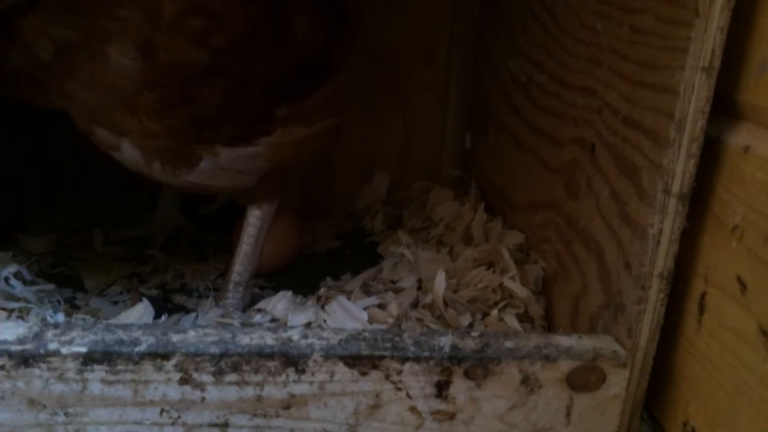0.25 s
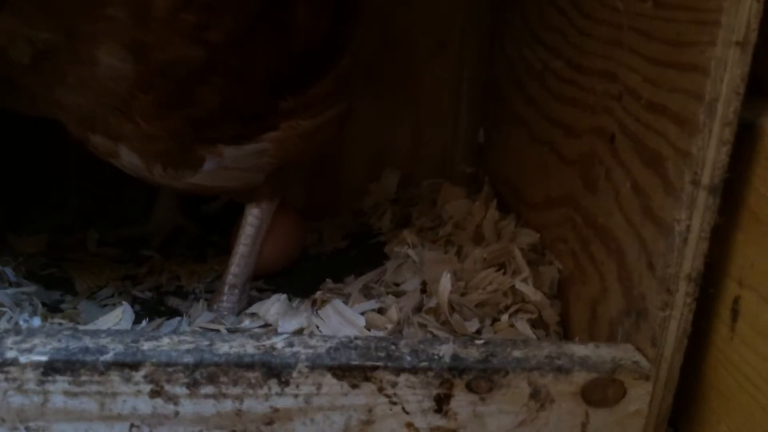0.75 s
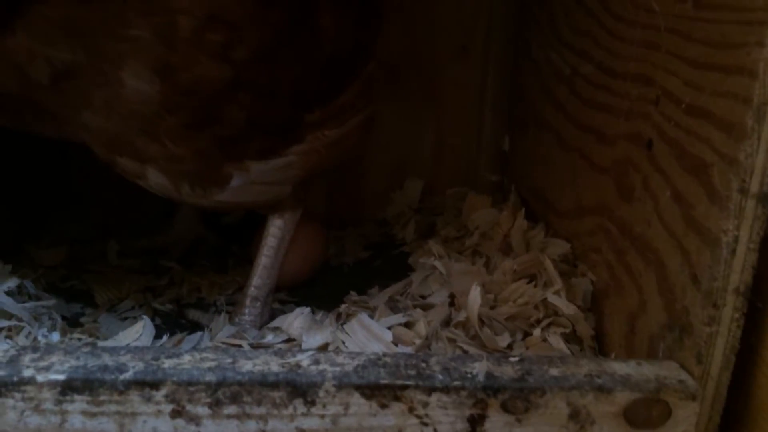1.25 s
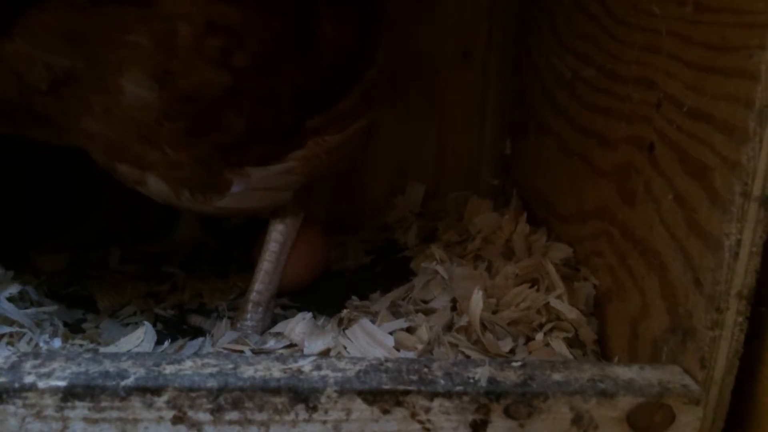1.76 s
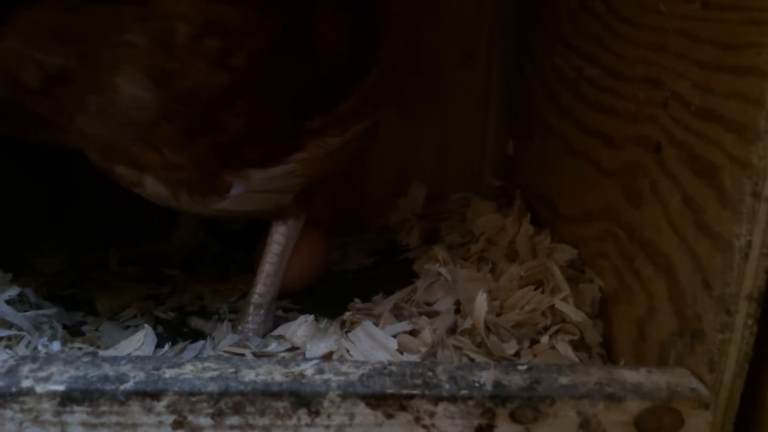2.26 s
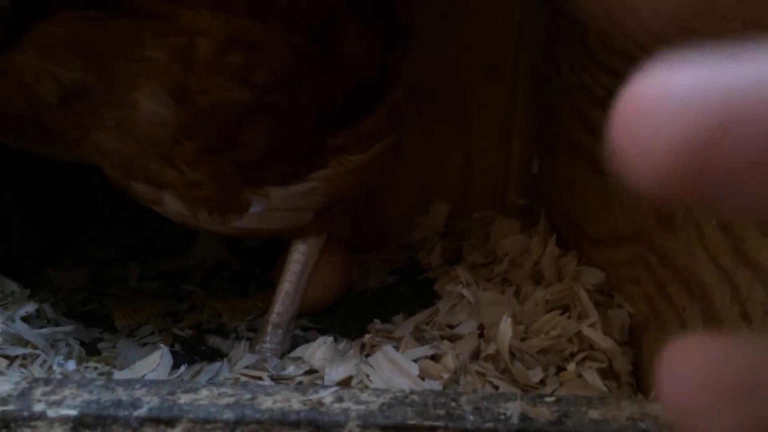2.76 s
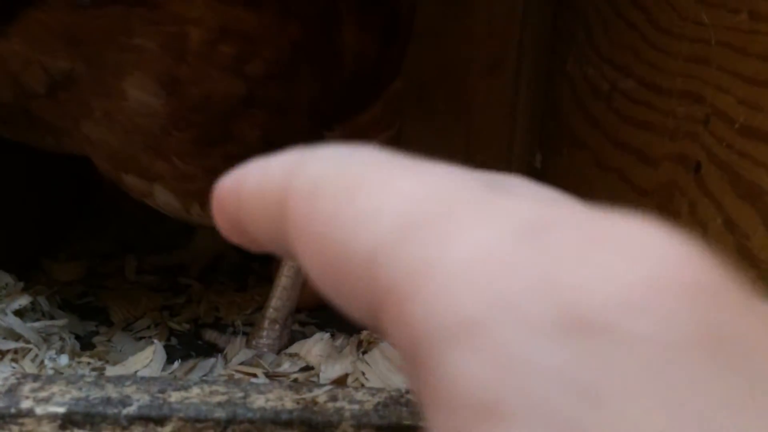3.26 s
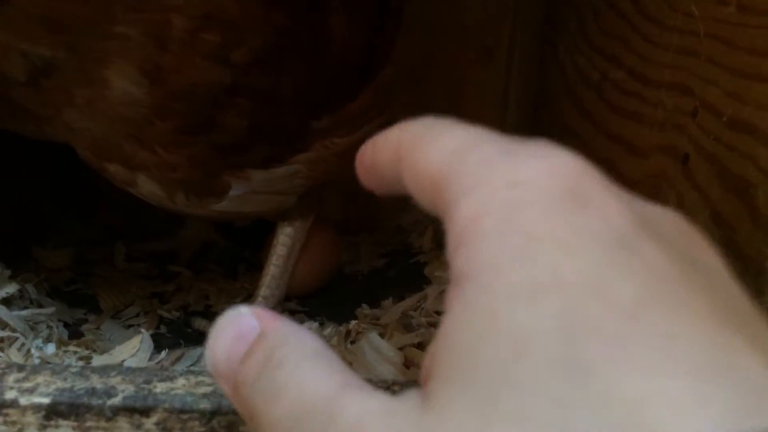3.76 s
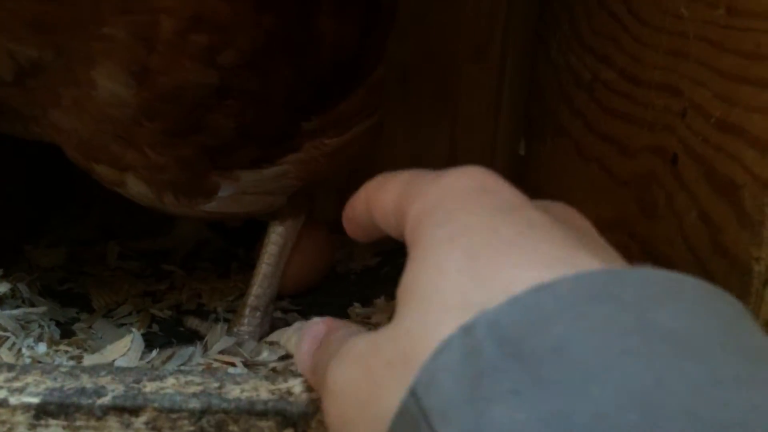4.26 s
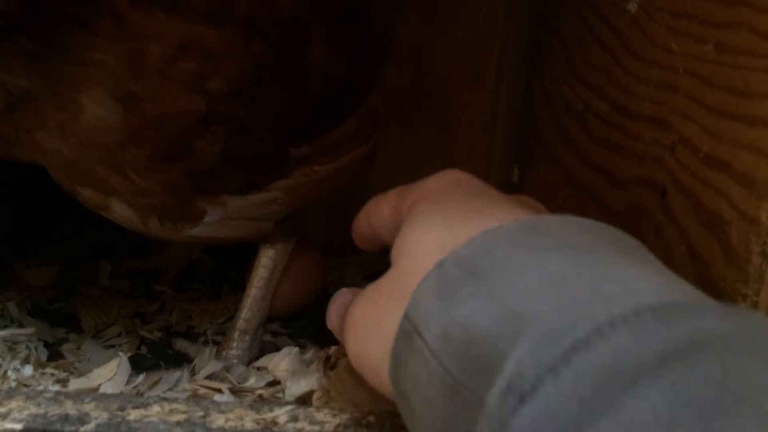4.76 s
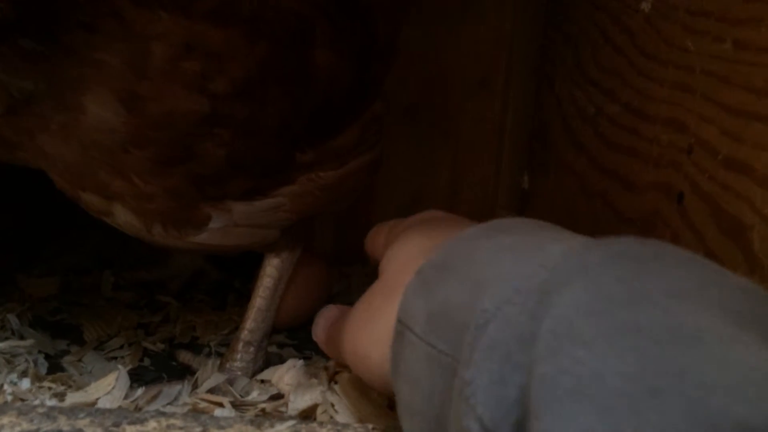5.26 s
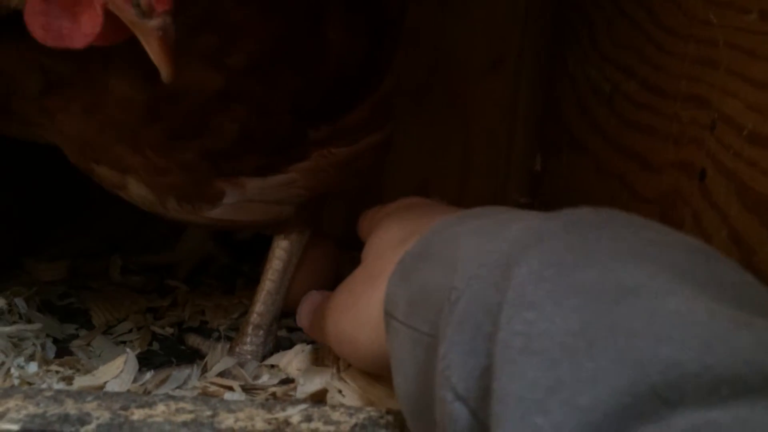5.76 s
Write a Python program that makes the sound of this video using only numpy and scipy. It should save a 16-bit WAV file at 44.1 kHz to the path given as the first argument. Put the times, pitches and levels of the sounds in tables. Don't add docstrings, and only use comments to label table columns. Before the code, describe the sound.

Close, raspy hen moans and broken clucking cries in a small box, with tiny dry shaving ticks over steady low hum and soft air.

```python
import sys
import numpy as np
from scipy import signal
from scipy.fft import rfft, irfft, next_fast_len
from scipy.io import wavfile
from scipy.ndimage import uniform_filter1d, map_coordinates

SR = 44100
rng = np.random.default_rng(int(sys.argv[2]) if len(sys.argv) > 2 else 0)


def boost(x):
    u = np.asarray(x, float) / 20
    return 10 ** u


def store_wav(level_fs):
    pcm = np.round(np.clip(np.atleast_2d(level_fs), -1, 1) * 32767)
    wavfile.write(sys.argv[1], SR, pcm.T.astype(np.int16))


N = 265041

# frequency_hz, gain_db
WINDPIPE = [(300, -44), (500, -4.5), (600, -7.5), (800, -14.5), (1150, 9), (1400, -1.5), (1600, -9),
            (1900, -20.5), (2250, -21.5)]
# frequency_hz, gain_db
BEAK = [(2300, -20), (2650, -13), (3020, 0), (3300, -9), (3650, -22), (4200, -15), (4900, -36), (6000, -46),
        (6700, -35), (7500, -54), (8450, -41), (9600, -47), (11000, -60), (15000, -62)]
SLIDE_DB = -31.5


def unit(x):
    return x / np.sqrt(np.mean(x ** 2) + 1e-20)


def along(points, hz):
    f, v = np.transpose(points)
    return np.interp(np.log(hz + 1), np.log(f + 1), v)


def wobble(rate):
    knots = rng.standard_normal(int(N * rate / SR) + 4)
    return map_coordinates(knots, [np.arange(N) * rate / SR])


def coloured(x, points):
    m = next_fast_len(N + 8192)
    gain = boost(along(points, np.fft.rfftfreq(m, 1 / SR)))
    return irfft(rfft(x, m) * gain, m)[:N]


def coloured_noise(points):
    return unit(coloured(rng.standard_normal(N), points))


def hen():
    # time_s, rasp_db, pitch_jitter_share
    breathiness = [(0, -16, .018), (.8, -13, .024), (1.3, -9, .045), (1.5, -15, .015), (1.7, -15, .018),
                   (1.8, -10, .035), (2.05, -22, .008), (2.7, -22, .007), (3.7, -14, .025),
                   (4.4, -13, .018), (4.88, -13, .018), (4.94, -5, .045), (5.0, -13, .018),
                   (5.5, -10, .022)]
    voice, time = np.zeros(N), np.arange(N) / SR
    rasp_s, *rasp_columns = np.transpose(breathiness)
    rasp_db, jitter = (np.interp(time, rasp_s, column) for column in rasp_columns)
    waver = 1 + jitter * (wobble(150) + .6 * wobble(300))
    low_flutter, high_flutter = boost(.8 * wobble(120)), boost(110 * jitter * wobble(170))

    low_air = coloured_noise(WINDPIPE + [(2400, -120)])
    high_air = coloured_noise([(2000, -120)] + BEAK[:5] + [(4300, -30), (9000, -70)])
    beads = coloured_noise([(3060 + side * 190, -9 * side ** 2) for side in np.arange(-4, 5)])
    sizzle = coloured_noise([(3600, -120)] + BEAK[5:] + [(15500, -120)])

    for throbs in calls():
        span = slice(round(throbs[0][0] * SR), round(throbs[-1][0] * SR))
        rasp = rasp_db[span]
        glide, octave, level, bright = gestures(throbs, time[span])
        low, high, phase = harmonics(glide * waver[span], octave)
        gate = boost(rasp) * (1 + 0.26 * np.cos(phase))
        windpipe_sound = low + gate * low_air[span]
        beak_sound = (high + boost(7) * gate * high_air[span]) / np.hypot(1, boost(8 + rasp))
        voice[span] += level * windpipe_sound * low_flutter[span]
        voice[span] += bright * beak_sound * high_flutter[span]
        voice[span] += bright * boost(3.5 + rasp) * beads[span]
        voice[span] += bright * boost(-27) * (1 + np.cos(phase)) * sizzle[span]
    return voice


def harmonics(glide, octave):
    pitch = glide * 2. ** octave
    phase = 2 * np.pi * np.cumsum(glide) / SR * 2. ** octave
    k = np.arange(1, 27)[:, None]
    hz = k * pitch
    flip_fade = np.clip(1 - 2 * (uniform_filter1d(octave * 1., size=400) - octave), 0, 1)
    odd = flip_fade * boost(-14 * np.clip((572 - pitch) / 20, 0, 1))
    source = np.where(k % 2, odd, 1)

    low = source * boost(along(WINDPIPE, hz)) * (hz < 2300)
    high = source * boost(along(BEAK, hz)) * (hz >= 2300) * (hz < SR / 3)
    top = hz > 3800
    high_note_loss_db = 13 * top * np.clip((pitch - 630) / 60, 0, 1)
    high *= boost(-high_note_loss_db - 5.8 * top * (pitch < 560) - 2 * (hz > 5000))

    waves = np.sqrt(2) * np.sin(k * phase)
    low_power = uniform_filter1d((low ** 2).sum(0), size=150)
    high_power = uniform_filter1d((high ** 2).sum(0), size=500)
    beak_even = 0.67
    low = (low * waves).sum(0) / np.sqrt(low_power)
    high = (high * waves).sum(0) / high_power ** (beak_even / 2)
    return low, high, phase


def gestures(throbs, t):
    s, peak_db, hz, dip_db, beak_db = np.transpose(throbs)
    step = np.diff(np.log2(hz))
    flips = np.r_[0, np.cumsum((step > .5) * 1 - (step < -.72))]
    rows = np.arange(len(s))
    place = np.interp(t, s, rows)
    octave = flips[np.round(place).astype(int)]
    dip = dip_db[place.astype(int)] * np.sin(np.pi * place) ** 4
    dwell = place - np.sin(2 * np.pi * place) / (2 * np.pi) * .75
    glide = 2 ** (np.interp(dwell, rows, np.log2(hz) - flips) + .002 * dip)
    edge = np.clip(np.minimum(t - s[0] + (s[0] == 0), s[-1] - t) / 0.019, 0, 1)
    level = boost(np.interp(dwell, rows, peak_db) + 1.4 * dip)
    bright = boost(np.interp(dwell, rows, beak_db) + 1.0 * dip)
    return glide, octave, level * edge, bright * edge


def calls():
    # time_s, peak_db, pitch_hz
    moan = [(0.0, -29, 1102), (.045, -33.5, 1090), (.09, -34.5, 1044), (.144, -30, 982),
            (.178, -27.5, 1017), (.212, -22.5, 1097), (.237, -16.5, 1123), (.267, -21.5, 1104),
            (.281, -24.5, 1101), (.329, -27.5, 1073), (.349, -29, 534.7), (.421, -28.5, 1047),
            (.449, -22, 1106), (.473, -20.5, 553.2), (.499, -26.5, 539.6), (.533, -27.5, 547),
            (.643, -20.5, 1088), (.668, -16, 1140), (.69, -23.5, 1115), (.85, -16, 1093),
            (.876, -23.5, 557.2), (.896, -22.5, 1078), (.92, -24, 1093), (.946, -22.5, 1085),
            (1.098, -18.5, 547), (1.123, -22, 1109), (1.149, -20.5, 1091), (1.273, -30, 823),
            (1.287, -15.5, 596), (1.293, -44, 611)]
    # time_s, peak_db, pitch_hz
    squawk = [(1.519, -19.5, 663.8), (1.546, -21, 590.7), (1.574, -34, 1119), (1.586, -32, 750),
              (1.632, -26.5, 775), (1.702, -31, 815), (1.718, -22, 676), (1.74, -26, 770),
              (1.75, -22, 505.7), (1.774, -27.5, 997), (1.79, -29.5, 798), (1.828, -29, 782.6),
              (1.852, -23, 1100), (1.864, -18.5, 1188), (1.874, -44, 1227)]
    # time_s, peak_db, pitch_hz
    wail = [(3.67, -39, 913.5), (3.715, -37.5, 970), (3.753, -31, 1069), (3.847, -34, 900.3),
            (3.883, -30.5, 966), (3.939, -27.5, 1021), (3.969, -26.5, 1127), (4.025, -27.5, 1005),
            (4.04, -36, 864), (4.071, -30.5, 758), (4.135, -33, 797.5), (4.147, -27, 1036),
            (4.171, -23, 509.2), (4.216, -27, 515.4), (4.246, -29, 774), (4.4, -31, 794),
            (4.672, -30, 813.2), (4.687, -14.5, 641.3), (4.712, -26.5, 631), (4.735, -30, 624.3),
            (4.757, -35, 818.2), (5.096, -32, 793.4), (5.118, -27.5, 1034), (5.138, -26.5, 1082),
            (5.155, -31, 786), (5.226, -29.5, 787.6), (5.278, -27.5, 727), (5.308, -33, 595),
            (5.43, -26.5, 599.5), (5.444, -51, 567)]
    # time_s, pitch_hz, level_db
    drone_points = [(1.7, 816, -29), (3.8, 1011, -33.5), (3.97, 980, -28), (4.09, 748, -36),
                    (4.14, 802, -17.5), (4.33, 784, -30.5), (4.46, 857, -31.5), (4.8, 810, -33.5),
                    (5.02, 852, -35.5), (5.19, 830, -34), (5.42, 770.4, -32.5)]
    # time_s, ring_db
    gape = [(0, -39), (.37, -38.5), (.48, -40.5), (.62, -37.5), (.77, -42), (.85, -34.5), (1.28, -41),
            (1.55, -41.5), (1.75, -35), (2.1, -42.5), (2.5, -36), (3.9, -50), (4.2, -43), (4.45, -43),
            (4.65, -38.5), (4.94, -36), (5.03, -36), (5.28, -35.5)]

    def climb(t, u):
        slack_hz, climb_to_hz = 899, 1057
        return slack_hz - 55 * t + (climb_to_hz - slack_hz) * u ** 2.2, -33.5

    def drone(t, u):
        drone_s, *columns = np.transpose(drone_points)
        return [np.interp(t, drone_s, column) for column in columns]

    four_calls = [(murmured(moan, climb, .015, 0.078, -11), 0.12),
                  (murmured(squawk, drone, .026, .03, -8.5), .4),
                  (cackle(), 0.83),
                  (murmured(wail, drone, .026, .03, -5.5), 0.73)]
    out = []
    for rows, ring_grows in four_calls:
        s, db, hz, dip = np.transpose(rows)
        tuned_db = along(BEAK, np.arange(2, 8)[:, None] * hz).max(0)
        ring_db = np.interp(s, *np.transpose(gape)) + ring_grows * (db - SLIDE_DB) + 0.1 * (tuned_db + 7.5)
        out.append(np.c_[s, db, hz, dip, ring_db])
    return out


def murmured(throbs, slack, step_s, scatter, dip_db):
    fill_over_s, murmur_dip, murmur_db = .048, 0.453, 0.5
    chance, rows = rng.standard_normal((700, 4)), []
    for (s, db, hz), (after, *_) in zip(throbs, throbs[1:] + throbs[-1:]):
        gap = after - s
        wide = gap > fill_over_s
        rows.append((s, db, hz, murmur_dip * dip_db if wide else dip_db * min(gap / 0.027, 1) ** 2))
        count = round(gap / step_s) if wide else 1
        for i in range(1, count):
            u = i / count
            a, b, c, d = np.clip(chance[round((s + u * gap) * 100)], -2, 2)
            t = s + (u + a / (5 * count)) * gap
            pitch, level = slack(t, i / max(count - 1, 1))
            pitch = pitch * (1 + scatter * (1 - u) * c)
            rows.append((t, level + murmur_db * b, pitch, murmur_dip * dip_db * (1 + d / 2)))
    return rows


def cackle():
    # peak_s, peak_db
    notes_played = [(2.097, -16.5), (2.168, -18), (2.244, -20), (2.346, -17), (2.422, -21.5),
                    (2.445, -21.5), (2.506, -17.5), (2.556, -15.5), (2.616, -20), (2.659, -16)]
    # start_s, level_db
    breaks = [(2.065, -28.5), (2.127, -33), (2.191, -21.5), (2.273, -24), (2.377, -22.5), (2.528, -27.5),
              (2.582, -25)]
    note_hz, break_hz, fall_hz, land_hz = 592.7, 1060, 830, 714.5
    turn_s, land_s, release_s = .01, 0.018, 0.011
    hold_s = .005
    note_tops, flips = np.transpose(notes_played)[0], np.transpose(breaks)[0]
    rows = [(flips[0] - land_s, -51, break_hz, -4), (note_tops[-1] + release_s, -34, note_hz, 0)]
    for (s, db), after in zip(notes_played, np.r_[note_tops[1:], 0]):
        broken = np.any((flips > s) & (flips < after))
        dip_db = 0 if broken else -210 * max(after - s, 0)
        rows += [(s - hold_s, db - 2.5, note_hz * 1.01, 0), (s + hold_s, db - 1.5, note_hz, dip_db)]
    for s, db in breaks:
        land = note_tops[note_tops > s][0] - land_s
        fall_s = min(s + turn_s, (s + land) / 2)
        fall_db = SLIDE_DB - 3.5 + 60 * (land - s)
        rows += [(s, db, break_hz, -3), (fall_s, fall_db, fall_hz, -1.5), (land, SLIDE_DB, land_hz, 0)]
        if s > flips[0]:
            rows.append((s - turn_s, db - 6, note_hz, -5))
    return sorted(rows)


def pips():
    # peak_s, peak_db, pitch_hz
    whistles = [(.297, -36, 3060), (0.324, -32, 3060), (0.369, -23, 3034), (.407, -30.5, 3070),
                (.44, -28.5, 3100), (.52, -26.5, 3060), (.548, -37.5, 3048), (.617, -26, 3060),
                (.637, -33, 3060), (.66, -25, 3060), (0.727, -28.5, 3040), (.745, -32, 3100),
                (.83, -30.5, 2920), (.89, -30.5, 2950), (1.046, -30, 2993), (1.262, -30, 2940),
                (1.752, -26.5, 3020), (1.776, -29, 3090), (2.201, -25, 2930), (2.31, -29, 2840),
                (4.604, -29, 3130), (4.656, -29, 3190), (4.82, -29, 3160), (4.939, -26.5, 3160),
                (5.096, -29, 3143), (5.158, -28, 3110), (5.226, -29, 3090), (5.277, -21.5, 2925)]
    out, t = np.zeros(N), np.arange(-SR // 40, SR // 40) / SR
    bell = np.exp(-(t / 0.0045) ** 2 / 2)
    for (s, db, hz), turn in zip(whistles, rng.uniform(0, 2 * np.pi, len(whistles))):
        burst = boost(db) * bell * np.sin(2 * np.pi * hz * t + turn)
        out[round(s * SR) - SR // 40:][:len(t)] += burst
    return out


def second_voice():
    # time_s, pitch_hz, level_db
    whistle_paths = [
        [(.95, 1101, -43.5), (1.27, 1103, -44)],
        [(4.5, 1157, -52), (4.6, 1150, -49), (4.67, 1170, -51)],
        [(4.88, 1157, -53), (4.93, 1060, -36.5), (4.97, 1130, -62), (5.14, 1119, -39), (5.17, 1131, -40),
         (5.26, 1116, -40), (5.33, 1157, -47)],
    ]
    out, time = np.zeros(N), np.arange(N) / SR
    for rows in whistle_paths:
        s, hz, db = np.transpose(rows)
        edge = np.clip(np.minimum(time - s[0], s[-1] - time) / 0.0073, 0, 1)
        pitch = np.interp(time, s, hz) * (1 + 0.0081 * wobble(70))
        phase = 2 * np.pi * np.cumsum(pitch) / SR
        out += edge * boost(np.interp(time, s, db) + 6.0 + 4.8 * wobble(50)) * np.sin(phase)
    return out


def shavings():
    # start_s, peak_db
    litter_ticks = [
        (0.247, -40.5),
        (0.438, -54),
        (0.6583, -40),
        (.722, -54),
        (.99, -58.5),
        (1.04, -58),
        (1.261, -52),
        (1.743, -49.5),
        (4.6873, -44),
        (5.27, -54),
    ]
    out, t = np.zeros(N + SR), np.arange(SR // 20) / SR
    for s, db in litter_ticks:
        out[round(s * SR):][:len(t)] += boost(db - 60 * t / .015) * rng.standard_normal(len(t))
    return coloured(out[:N], [(300, -23), (1000, 5.5), (3000, 24.5), (6000, -2.5), (15000, -32)])


def box(x):
    # frequency_hz, t60_s
    box_decay = [(300, 0.22), (1200, 0.29), (4000, 0.063), (12000, 0.0067)]
    hz, t, z = signal.stft(rng.standard_normal(SR // 3), SR, nperseg=256)
    decay = boost(-60 * t / along(box_decay, hz)[:, None])
    tail = signal.istft(z * decay, SR, nperseg=256)[1]
    return signal.fftconvolve(np.pad(x, (200, 0)), tail / np.linalg.norm(tail))[:N]


def motor():
    # multiple, level_db
    shaft_orders = [(3, -68.5), (4, -45.5), (5, -36.5), (7, -58.5), (25, -64), (30, -63.5), (35, -66),
                    (40, -62.5), (45, -71), (55, -64.5)]
    phase = 2 * np.pi * 27.31 * np.arange(N) / SR
    hum = np.zeros(N)
    for k, db in shaft_orders:
        strength = np.sqrt(2) * boost(db + wobble(16.0))
        hum += strength * np.sin(k * phase + 1.4 * wobble(4.4) + rng.uniform(0, 2 * np.pi))
    return hum


def air():
    # frequency_hz, density_db_per_hz
    hiss_spectrum = [(20, -12.5), (50, -4.5), (90, 10), (140, 3), (200, -5), (320, -5), (630, -11.5),
                     (1500, -12.5), (3200, -7.5), (4000, -15.5), (5300, -28.5), (7000, -39.5),
                     (10000, -49.5), (15000, -50.5)]
    z = signal.stft(rng.standard_normal(N), nperseg=512)[2]
    field = uniform_filter1d(rng.standard_normal(z.shape), size=6, axis=0)
    field = uniform_filter1d(field, size=12, axis=1)
    hiss = signal.istft(z * boost(.8 * unit(field)), nperseg=512)[1][:N]
    return boost(-44 + 0.35 * wobble(0.68)) * unit(coloured(hiss, hiss_spectrum))


def scene():
    near = hen() + pips() + second_voice() + shavings()
    echo = boost(-17) * box(near)
    return (near + echo + motor() + air())[None]


def roll_off(x):
    return signal.sosfilt(signal.butter(12, 15300, fs=SR, output="sos"), x)


def record(dry):
    return roll_off(dry)


dry = scene()
out = record(dry)
store_wav(out)
```